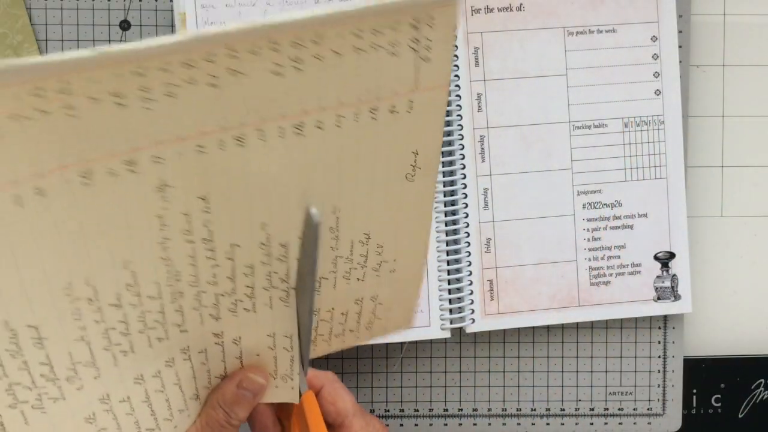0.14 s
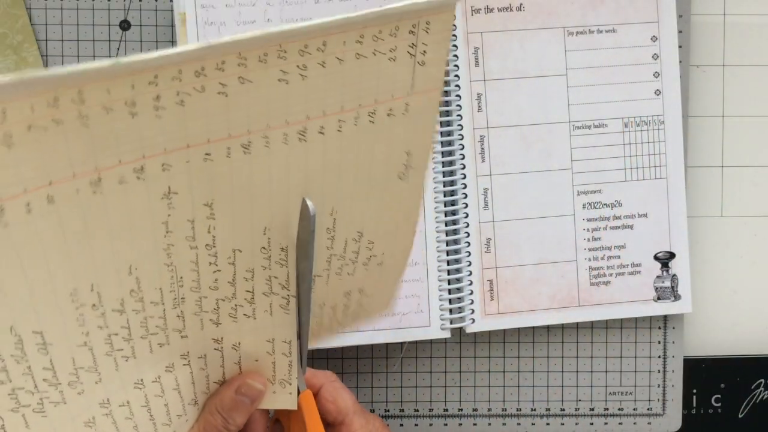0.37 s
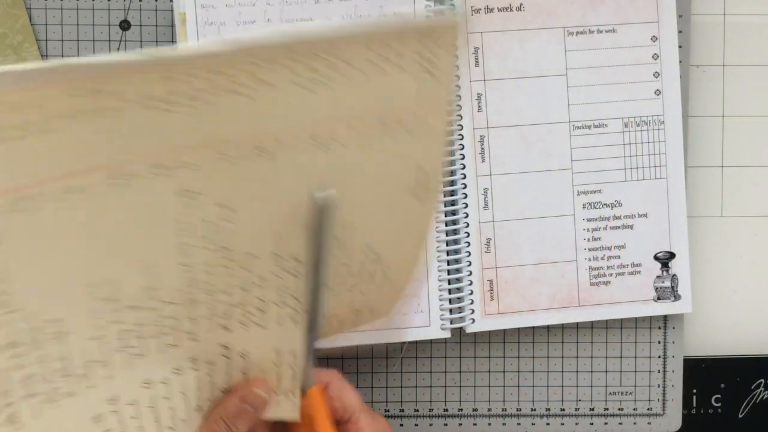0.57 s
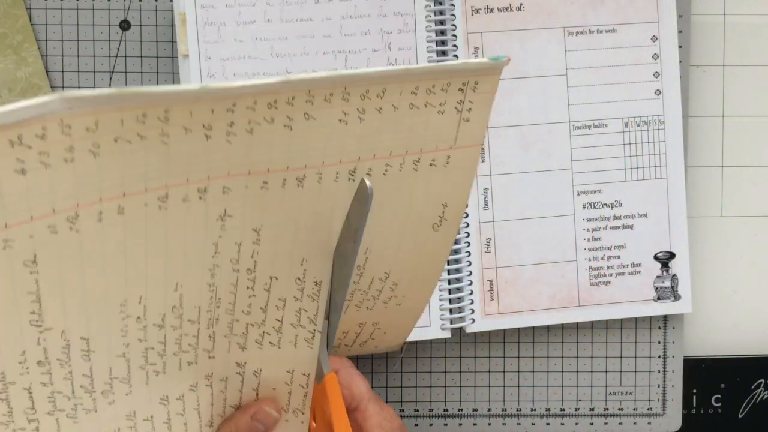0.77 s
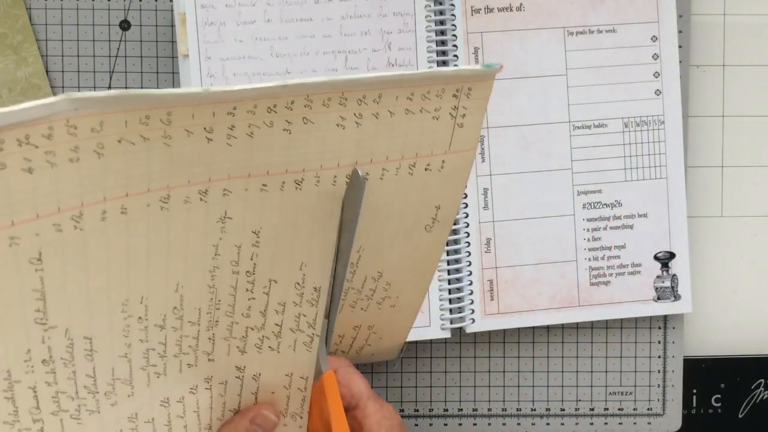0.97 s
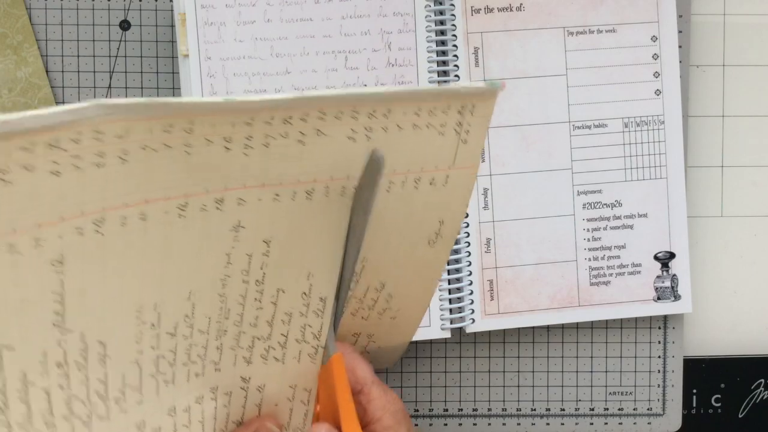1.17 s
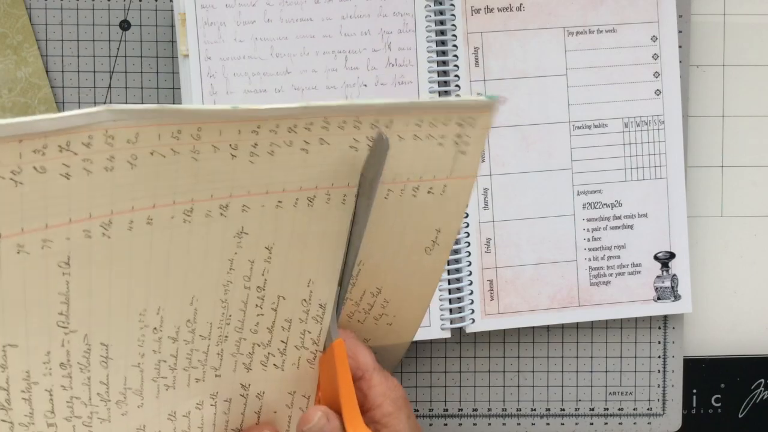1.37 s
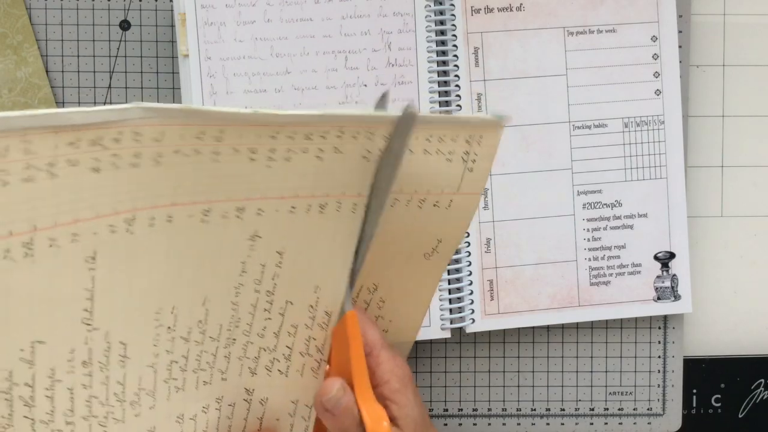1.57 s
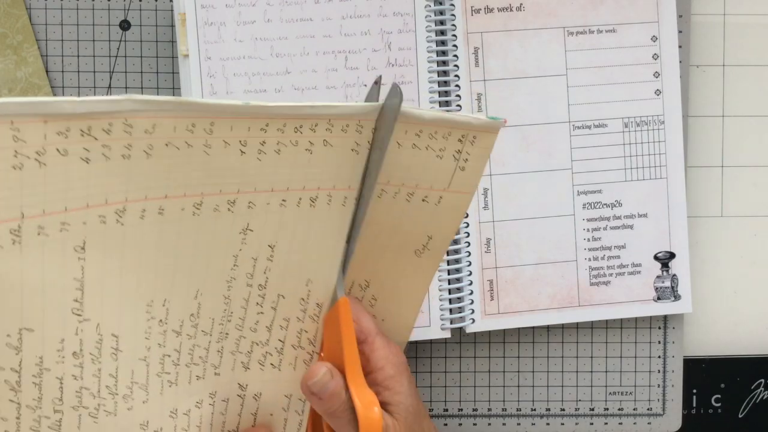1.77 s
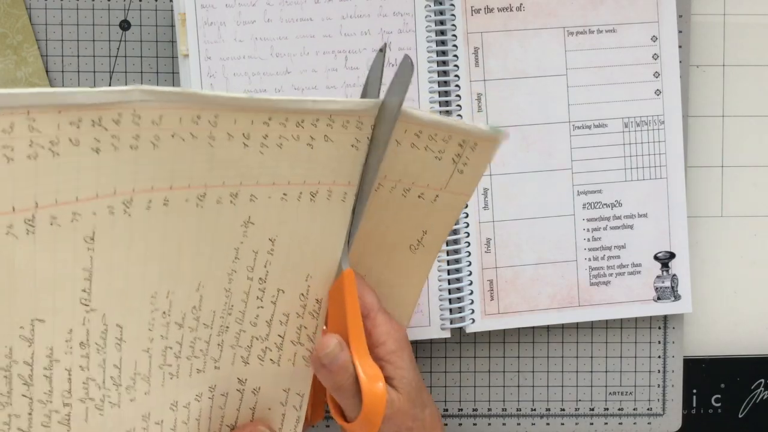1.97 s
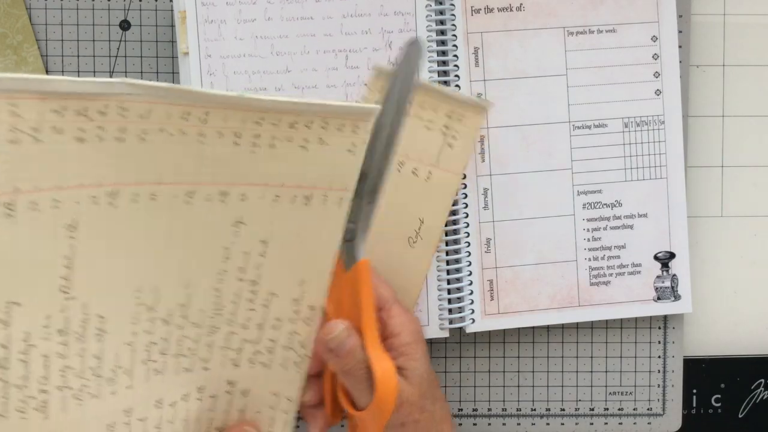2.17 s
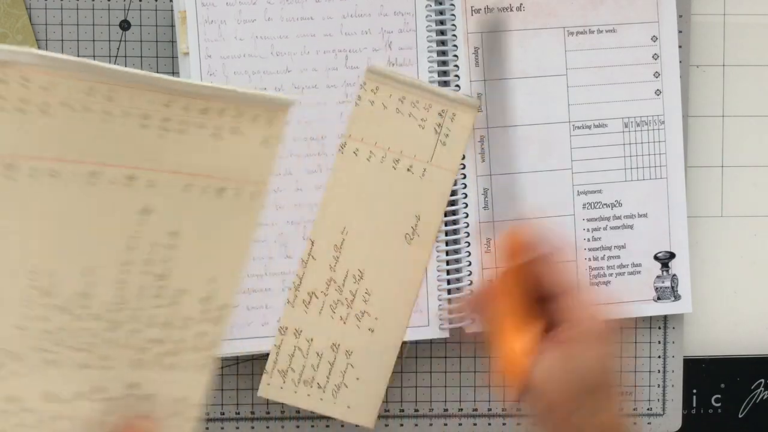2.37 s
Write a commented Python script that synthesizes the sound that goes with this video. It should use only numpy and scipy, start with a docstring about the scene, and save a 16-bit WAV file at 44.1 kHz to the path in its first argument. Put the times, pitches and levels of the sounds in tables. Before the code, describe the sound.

Scissors cutting through a large sheet of old paper in crunchy, jerky snips, close up

```python
"""Scissors through old paper

Scissors work through a large sheet of old paper held over a desk, close to the microphone, in a quiet room.
Each closing stroke snaps fibres in jerks; between strokes the opening blades slide along the cut edge. Both are
dense random clicks that drive the sheet's drumming, a rasp, bright treble and ringing steel. Buckling pops and
low ticks of catching blades are short damped sines, bites are noise bursts; sparse echoes and faint noise make
the room."""
import sys
import numpy as np
from scipy import signal
from scipy.io import wavfile
from scipy.ndimage import uniform_filter1d

SR = 44100
rng = np.random.default_rng(int(sys.argv[2]) if len(sys.argv) > 2 else 0)


def transcribe(signal):
    """Save signal, clipped to [-1, 1], as a 16-bit WAV file at the path in sys.argv[1]."""
    frames = np.atleast_2d(signal).T
    limited = np.clip(frames, -1, 1)
    pcm = np.round(limited * 32767).astype(np.int16)
    wavfile.write(sys.argv[1], SR, pcm)


def nominal_scale(level):
    """Amplitude ratio for a level in decibels (scalar or array-like)."""
    x = np.asarray(level, float) / 20
    return 10 ** x


N = 106942  # length in samples

# ringing notes of the steel blades: (f/Hz, level/dB, width/Hz; resonators are kept at least 80 Hz wide)
BLADES = [(2830, -19, 840), (4360, -6, 33), (5070, -0.5, 330), (5660, 2, 880), (7200, -6, 580),
          (7960, -36, 170)]


def evened(x):
    """Scales to rms 1."""
    return x / np.sqrt(np.mean(x ** 2) + 1e-20)


def read(points, hz):
    """Reads a table on a log-frequency axis."""
    f, value = np.transpose(points)
    return np.interp(np.log(hz + 1), np.log(f + 1), value)


def add(mix, s, sound):
    """Mixes a sound in at time s."""
    part = mix[round(s * SR):][:len(sound)]
    part += sound[:len(part)]


def colour(x, points):
    """Causal minimum-phase filter with the given spectrum, floored at -90 dB."""
    hz = np.abs(np.fft.fftfreq(4096, 1 / SR))
    log_gain = np.log(nominal_scale(np.maximum(read(points, hz), -90)))
    taps = np.fft.ifft(np.exp(np.conj(signal.hilbert(log_gain)))).real[:2048]
    return signal.oaconvolve(x, taps)[:len(x)]


def resonate(x, hz, width_hz):
    """A resonance of gain 1 that follows the curve hz: shift down to 0 Hz, smooth, shift back."""
    turn = np.exp(2j * np.pi * np.cumsum(hz * np.ones(len(x))) / SR)
    r = np.exp(-np.pi * width_hz / SR)
    smoothed = signal.lfilter([1 - r], [1, -r], x / turn + 1e-18)
    return 2 * (turn * smoothed).real


def crackle(per_s, spread_db, clump_db, clump_s, hiss):
    """Dense clicks of random sign and size that come in clumps, over a little hiss."""
    hit, size = rng.random(N), rng.exponential(1, N)
    sign, slow, fine = rng.standard_normal((3, N))
    wide = max(int(clump_s * SR), 2)
    swell = uniform_filter1d(uniform_filter1d(slow, wide), wide)
    clumps = nominal_scale(clump_db * evened(swell))
    clicks = (hit < per_s / SR) * np.sign(sign) * nominal_scale(spread_db * np.minimum(size, 4))
    return evened(clumps * (evened(clicks) + hiss * fine))


def flexing(x, patchy_db):
    """The bending sheet favours other narrow bands from moment to moment."""
    z = signal.stft(x, nperseg=512, noverlap=384)[2]
    patches = rng.standard_normal(z.shape[::-1]).T
    patches = uniform_filter1d(patches, size=3, axis=0)  # over frequency
    patches = evened(uniform_filter1d(patches, size=12, axis=1))  # over time
    return evened(signal.istft(z * nominal_scale(patchy_db * patches), nperseg=512, noverlap=384)[1][:N])


def paper(strokes, drive, fine, sheet, treble, drum, drum_hz, ring_db):
    """The clicks shake the sheet, whose drumming moves with the blades, and ring the steel a little."""
    # the blades stall (below 0) or jump through the fibres: (t/s, surge/dB, half-length/s)
    jerks = [(0.075, 0, 0.011), (0.395, -0.5, 0.0037), (0.408, 0, .003), (0.415, 5.5, 0.005),
             (.507, 8, 0.00074), (0.543, -9, 0.0047), (0.557, 1.5, 0.0022), (0.565, -12, 0.0047),
             (0.982, 4.5, 0.0069), (1.042, 2.5, 0.0049), (1.081, 9, 0.0065), (1.493, -3, .003),
             (1.505, 6, 0.0067), (1.539, 2, 0.0043), (1.564, 3, .002), (1.76, 23, 0.0031),
             (1.773, 14.5, 0.0013), (1.78, 6.5, 0.0018), (1.787, 0.5, .002), (1.807, 6, 0.0054),
             (1.814, 2.5, 0.0025), (1.822, -7, 0.0041), (1.827, 1, .003), (1.832, 4.5, 0.006),
             (2.154, 16, 0.0014), (2.199, 3.5, 0.0018), (2.274, -1.5, .004), (2.282, 8, 0.0016),
             (2.291, 6, 0.0034)]
    # spectrum of the rasp: (f/Hz, level/dB per Hz)
    rasp_spectrum = [(1500, -32), (2000, 0.5), (2600, 4), (3500, -3.5), (4500, -34)]
    # the sheet's own notes: (f/Hz, level/dB, width/Hz)
    sheet_modes = [(520, -20, 89), (770, -19, 40), (957, -17.5, 35), (1468, -24.5, 20), (2465, -25.5, 14)]
    jerk_rise = 0.7  # a jerk sets in faster than it dies away (share of its half-length)
    deep_hz, deep_db_per_octave = 800, -18  # the sheet's lowest notes fade as its drumming rises

    t, level_db, rasp_db, top_db, hz = np.transpose(sorted(sum(map(list, strokes), [])))
    now = np.arange(N) / SR
    moving = sum((now >= rows[0][0]) & (now <= rows[-1][0]) for rows in strokes) > 0
    level = uniform_filter1d(moving * 1., 200) * nominal_scale(np.interp(now, t, level_db))
    surge_db = np.zeros(N)
    for s, db, half_s in jerks:
        length = np.where(now < s, jerk_rise * half_s, half_s)
        surge_db += db * np.exp(-((now - s) / length) ** 2)
    level = level * nominal_scale(surge_db)

    centre = np.exp(np.interp(now, t, np.log(hz)))
    body = evened(colour(drive, sheet))
    deep = signal.filtfilt(*signal.butter(2, 550, fs=SR), body)
    body = body + deep * (nominal_scale(deep_db_per_octave * np.log2(centre / deep_hz)) - 1)
    body = evened(body + drum * evened(resonate(drive, centre, drum_hz)))
    body = body + sum(nominal_scale(db) * evened(resonate(drive, f, w)) for f, db, w in sheet_modes)

    rasp = nominal_scale(np.interp(now, t, rasp_db)) * evened(colour(drive, rasp_spectrum))
    top = level * nominal_scale(np.interp(now, t, top_db))
    middles = [np.mean(rows, 0)[0] for rows in strokes]
    strike = nominal_scale(np.interp(now, middles, ring_db)) * top * fine
    ring = np.zeros(N)
    for f, db, w in BLADES:
        ring += nominal_scale(db) * np.sqrt(SR / w / 20) * resonate(strike, f, max(w, 80))
    return level * (body + rasp) + top * evened(colour(fine, treble)) + ring


def sliding(rub):
    """The blades open and slide forward, rubbing along the cut edge of the sheet."""
    # one table a slide: (t/s, sheet level/dB, rasp over it/dB, treble over it/dB, centre of drumming f/Hz)
    slides = [
        [(0.0, -51.5, -8, -2, 638), (0.018, -69.5, 10, 9, 680), (0.026, -50, -3.5, -1.5, 726),
         (0.06, -49.5, -18, -6.5, 990), (0.072, -63, 2, 6.5, 925), (0.098, -52, -4, 11.5, 630),
         (0.106, -47, -6, -1, 648), (0.12, -52.5, 4, 6, 630), (0.17, -52, 2, -1, 1510),
         (0.246, -50.5, -2, -2.5, 1160), (0.282, -55.5, -12, -9, 1150)],
        [(0.62, -77, -3, -3, 1130), (0.65, -53, -4, -4.5, 1240), (0.678, -47, -4.5, 3, 1010),
         (0.708, -42.5, -5, -8, 790), (0.726, -47.5, -5.5, -5.5, 808), (0.766, -54.5, -8.5, -11.5, 850),
         (0.812, -56.5, -7, -9, 710), (0.838, -58.5, 3.5, -3, 600), (0.862, -60.5, 0, -3.5, 514),
         (0.906, -70, -6, -10, 695), (0.94, -71, -8, -27, 698)],
        [(1.18, -61, -4, -9, 869), (1.208, -59.5, -6, -1.5, 760), (1.248, -46, -10.5, -9.5, 940),
         (1.258, -49, -5, -2.5, 980), (1.306, -56, -5, -4.5, 1030), (1.35, -55.5, -4, -7, 1050),
         (1.364, -59.5, -2, 0, 1180), (1.392, -53.5, -3.5, -12, 1260), (1.404, -76, -10, 0, 1260),
         (1.42, -86, -5, -7, 1260)],
        [(1.6, -59, 5, -3, 1200), (1.614, -57.5, 4, 3, 1200), (1.622, -41.5, -15, -16, 1210),
         (1.642, -44.5, -5.5, -8.5, 1070), (1.686, -47, 6.5, -3, 1060), (1.734, -75, -12, -11, 935),
         (1.75, -63, -6, -4, 950)],
        [(1.92, -70, -8, -5, 933), (1.938, -69, 3, 0, 1040), (1.958, -51, -2.5, -7, 1260),
         (2.008, -41, -2, -5.5, 1350), (2.02, -50.5, 6.5, -3, 1200), (2.032, -44.5, -7.5, -12, 920),
         (2.058, -61, -1, -3.5, 648), (2.09, -68, -18, -11, 660), (2.112, -61, -1, -9, 578),
         (2.12, -78, -9, -9, 580)],
    ]
    # spectra of the sheet and of the treble: (f/Hz, level/dB per Hz)
    slide_sheet = [(59, -61), (100, -22.5), (396, -2), (720, -6), (1080, 0), (2100, -7.5), (2730, -29),
                   (4620, -120)]
    slide_treble = [(2060, -36.5), (3500, -1), (5640, -2), (6360, -3), (8050, -2), (9560, -5.5),
                    (11000, -7), (13800, -10.5), (16000, -14.5)]
    # how strongly the steel rings in each slide, in time order: (level/dB)
    slide_ring_db = [-27, -4, -10.5, 2.5, -9.5]
    return paper(slides, rub, rub, slide_sheet, slide_treble, drum=0.057, drum_hz=950, ring_db=slide_ring_db)


def room(x):
    """Sparse taps of random sign, each band dying at its own speed."""
    # decay of the room: (f/Hz, t60/s)
    decay = [(250, 0.37), (1000, 0.17), (4000, 0.18), (12000, 0.069)]
    taps = np.zeros(SR // 2)
    at = np.arange(200, len(taps) - 20, 20)
    taps[at + rng.integers(0, 20, len(at))] = rng.choice([-1., 1.], len(at))
    hz, t, z = signal.stft(taps, SR, nperseg=256)
    fading = z * nominal_scale(-60 * t / read(decay, hz)[:, None])
    tail = signal.istft(fading, SR, nperseg=256)[1]
    return signal.fftconvolve(x, tail / np.linalg.norm(tail))[:N]


def air():
    """Faint hush of the room and a lumpy low rumble from the moving sheet and hands."""
    # spectra of the hush and of the rumble: (f/Hz, level/dB per Hz)
    hush_spectrum = [(88, 0.5), (150, -8), (1390, -6), (3290, -10.5), (7920, -20), (13400, -19.5),
                     (14200, -33), (16000, -24)]
    rumble_spectrum = [(12, -40), (20, -65), (65, -2), (97, -2), (140, 2.5), (170, -3.5), (220, 1),
                       (370, -120)]
    # level of the low rumble: (t/s, level/dB)
    sway_points = [(0.0, -76), (0.095, -65), (0.108, -60), (0.13, -67.5), (0.45, -74), (0.52, -62),
                   (0.61, -81), (0.73, -65), (0.8, -80), (1.44, -80), (1.6, -64.5), (1.74, -92),
                   (1.86, -80), (1.91, -91), (2.03, -61), (2.08, -93), (2.24, -55.5), (2.26, -68.5),
                   (2.42, -80)]
    hush_db = -70
    a, b, c = rng.standard_normal((3, N))
    lumps = nominal_scale(2.5 * evened(uniform_filter1d(uniform_filter1d(c, 1000), 1000)))
    sway = nominal_scale(np.interp(np.arange(N) / SR, *np.transpose(sway_points)))
    rumble = sway * evened(lumps * colour(b, rumble_spectrum))
    return nominal_scale(hush_db) * evened(colour(a, hush_spectrum)) + rumble


def pop(s, peak_db, hz, rebound_db, rebound_s):
    """A cycle or two of buckling paper or a catching blade, with a short crack, a rattling rebound and a soft
    flutter."""
    t = np.arange(3000) / SR
    push = np.sin(2 * np.pi * hz * t) * (t * hz) ** 1.25 * np.exp(-t * hz * 3.34)
    push = signal.lfilter(*signal.butter(3, hz * 0.45, "high", fs=SR), push)
    push = push / abs(push).max()
    rattle_noise, crack_noise = rng.standard_normal((2, len(t)))
    flutter = nominal_scale(-37.0 - 60 * t / 0.21) * np.minimum(t / 0.0013, 1)
    rebound = nominal_scale(rebound_db - 2.5) * np.exp(-((t - rebound_s) / 0.0027) ** 2)
    rattle = (flutter + rebound) * evened(resonate(rattle_noise, hz * 1.31, 600))
    crack = nominal_scale(-30 - 60 * t / 0.0028) * resonate(resonate(crack_noise, 3000, 4000), 3000, 4000)
    second_crack = np.roll(crack, int(rebound_s * SR)) / 2
    return s, nominal_scale(peak_db) * (push + rattle + crack + second_crack)


def cutting(snaps, rub):
    """The blades close and snap the fibres in jerks, shaking the sheet."""
    # one table a closing stroke: (t/s, sheet level/dB, rasp near 2.7 kHz over it/dB, treble over it/dB,
    # centre of the sheet's drumming f/Hz)
    cuts = [
        [(0.365, -64, -3, -26, 570), (0.377, -47.5, 5.5, 1, 570), (0.405, -43.5, -8.5, -9, 940),
         (0.421, -40, -0.5, -10.5, 970), (0.433, -44, -7, -10, 970), (0.455, -45, -6, -9.5, 700),
         (0.467, -49, -5, -7, 590), (0.505, -40.5, -12, -16.5, 881), (0.521, -46, -6, -11, 960),
         (0.561, -46, -7, -11, 800), (0.571, -49, 3.5, -3, 793), (0.585, -69, -24, -12, 823),
         (0.6, -76, -6, -2, 900)],
        [(0.95, -76, -25, -32, 1550), (0.98, -40, -10, -7.5, 1250), (1.036, -38.5, -8, -7.5, 1040),
         (1.05, -35.5, -10, -7, 930), (1.088, -47.5, -6, -3, 770), (1.124, -44, -8, -2.5, 590),
         (1.138, -55, 1, -2, 636), (1.149, -51.5, 2, -5, 710), (1.155, -70, -2, -4, 700),
         (1.17, -55, -6, -9, 836)],
        [(1.425, -117, -15, -13, 1200), (1.432, -73, -1, 2, 1140), (1.436, -38, 0.5, -14, 1100),
         (1.443, -35.5, -3, -9.5, 1030), (1.463, -39.5, -6, -7, 880), (1.505, -42, -6, -9, 890),
         (1.511, -50.5, -12, -8, 890), (1.527, -44.5, -4.5, -6, 710), (1.581, -57.5, 2, 1.5, 716),
         (1.6, -59, 1, 2, 784)],
        [(1.755, -73, 6, -6, 1130), (1.759, -78.5, 0, -5, 1070), (1.787, -36.5, 1.5, -4, 1130),
         (1.795, -46.5, -5, -5.5, 1230), (1.807, -38.5, -1.5, -5.5, 1180), (1.824, -44, 2, -0.5, 560),
         (1.839, -42.5, -1, 1.5, 655), (1.845, -56, 2, 8, 630), (1.859, -49, 2, 2, 574),
         (1.879, -71, 3, 9, 578), (1.891, -68, -18, -2, 574), (1.9, -77, -3, 14, 569)],
    ]
    # the last stroke, jerking through the folded edge, same columns
    last_cut = [(2.125, -80, -10, -14, 1180), (2.132, -66, -9, -14, 1180), (2.137, -33, -7, -8, 1700),
                (2.145, -39.5, -8.5, -10, 1730), (2.155, -55.5, -5, -6, 1610), (2.171, -70, -20, 0, 1500),
                (2.185, -39, -19, -13, 1470), (2.193, -42.5, 5.5, 8.5, 1210), (2.198, -46.5, 3.5, 7, 1210),
                (2.202, -47.5, -14, -1, 1150), (2.219, -46, -13, -5, 890), (2.222, -30.5, -6, -21, 1080),
                (2.231, -32, -11, -25, 1140), (2.243, -40, -4, -5, 1190), (2.261, -54, -13, -5, 1160),
                (2.281, -50.5, 2.5, 2, 840), (2.299, -44.5, -8, -1.5, 800), (2.305, -37, -12, -15, 776),
                (2.331, -54.5, -40, -11, 770), (2.347, -68.5, 1, 3, 823), (2.381, -64.5, -11, 3, 580),
                (2.389, -73.5, 1, 8, 572), (2.42, -67, 3, 11.5, 754)]
    # spectra of the sheet and of the treble: (f/Hz, level/dB per Hz)
    cut_sheet = [(59, -79), (100, -24.5), (284, -11.5), (461, -5.5), (990, -6.5), (2100, -3.5), (2730, -43),
                 (4620, -120)]
    cut_treble = [(2060, -62), (3500, -1), (4000, 2), (5090, 1.5), (6530, -3), (8500, -5), (12400, -8.5),
                  (14500, -12), (15900, -21), (16400, -18)]
    # how strongly the steel rings in each stroke, in time order: (level/dB)
    cut_ring_db = [-4.5, -16, 7, -26, -20]
    fine = evened(snaps + 1.1 * rub)
    return paper(cuts + [last_cut], snaps, fine, cut_sheet, cut_treble, drum=0.31, drum_hz=200,
                 ring_db=cut_ring_db)


def bite(s, level_db, t60):
    """A burst of snapping fibres, wide in band, tinted by the steel."""
    t = np.arange(2048) / SR
    spectrum = [(150, -48), (600, -0.5), (2500, 8), (6000, 1.5), (15000, 0.0)]  # (f/Hz, level/dB per Hz)
    burst = evened(colour(rng.standard_normal(len(t)), spectrum))
    steel = sum(nominal_scale(db) * resonate(burst, f, max(w, 80)) / np.sqrt(w) for f, db, w in BLADES)
    burst = evened(burst + 0.7 * evened(steel))
    decay = nominal_scale(level_db - 60 * np.maximum(t - .001, 0) / t60)
    return s - .001, decay * np.minimum(t / 0.0013, 1) * burst


def scene():
    """Cuts, slides, pops and bites from a sheet too thin to radiate bass, then the room."""
    # the sheet buckles, or the blades catch in the fibres with a low tick during a cut: (t/s, push level/dB,
    # pitch f/Hz, # rebound level over it/dB before a fixed trim, rebound delay/s)
    pops = [(0.0261, -33.5, 605, -8.5, 0.0054), (0.0499, -32, 930, -31, 0.0032),
            (.1055, -33, 624, -29, 0.0097), (0.2951, -17, 1040, -20, 0.0032),
            (0.3788, -33, 390, -7.5, 0.001), (1.0615, -35, 800, -26, 0.0031),
            (1.0995, -29, 800, -19, 0.0043), (1.1152, -31, 714, -15, 0.0028),
            (1.1229, -35, 490, -5, 0.0053), (1.4567, -27.5, 800, -6.5, 0.0051),
            (1.524, -36.5, 680, -5.5, 0.0024), (1.6238, -24.5, 1250, -12, 0.002),
            (2.028, -33.5, 430, -7, 0.012), (1.856, -40.5, 590, -6, 0.0087),
            (2.2207, -32, 1180, 3.5, 0.0063), (2.302, -54, 777, -21, 0.0042)]
    # blades bite in with a bright snap: (t/s, level/dB, t60/s)
    bites = [(0.3788, -24, 0.0097), (2.1885, -30, 0.02), (2.2212, -32, .02), (2.3088, -29, 0.005)]
    room_db = -17
    snaps = crackle(per_s=9000, spread_db=3.3, clump_db=1.3, clump_s=0.00076, hiss=0.8)
    rub = crackle(per_s=9000, spread_db=3.2, clump_db=0.98, clump_s=0.0012, hiss=0.54)
    snaps, rub = flexing(snaps, patchy_db=1.5), flexing(rub, patchy_db=2.15)
    near = sliding(rub) + cutting(snaps, rub)
    for row in pops:
        add(near, *pop(*row))
    for row in bites:
        add(near, *bite(*row))
    near = colour(near, [(30, -22), (120, -2.0), (300, -0.5), (16000, -4.5)])
    return (near + nominal_scale(room_db) * room(near) + air())[None]


def band_limit(x):
    """A steep low-pass at the top of the band."""
    return signal.sosfilt(signal.butter(12, 16460, fs=SR, output="sos"), x)


def record(dry):
    """The close microphone's bass roll-off, then a band limit at 16 kHz."""
    mic_low_hz = 51.7
    thin = signal.lfilter(*signal.butter(2, mic_low_hz, "high", fs=SR), dry)
    edge = signal.firwin(511, 16000, window=("kaiser", 9), fs=SR)
    return band_limit(signal.oaconvolve(thin, edge[None], "same"))


dry = scene()
out = record(dry)
transcribe(out)
```